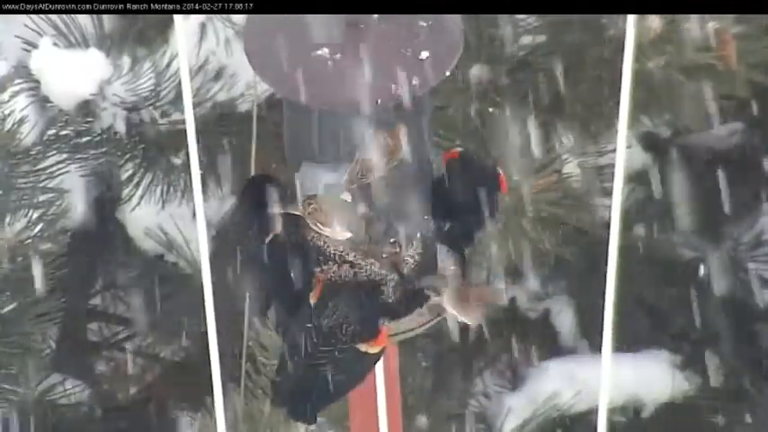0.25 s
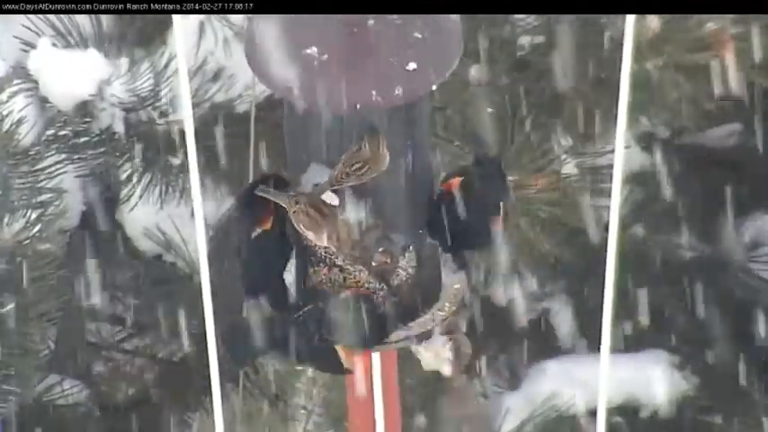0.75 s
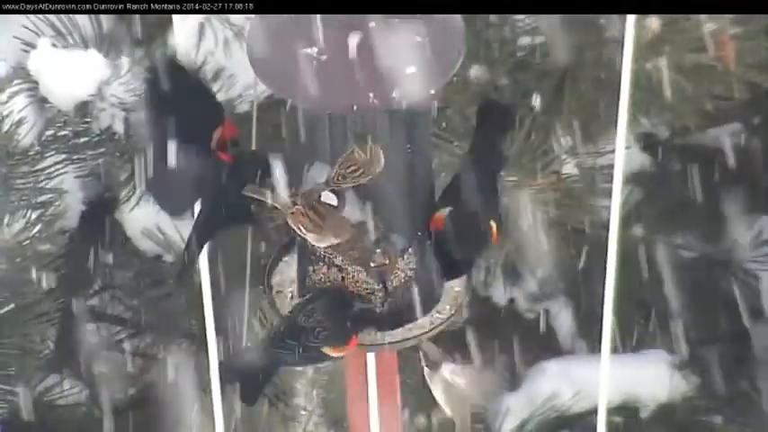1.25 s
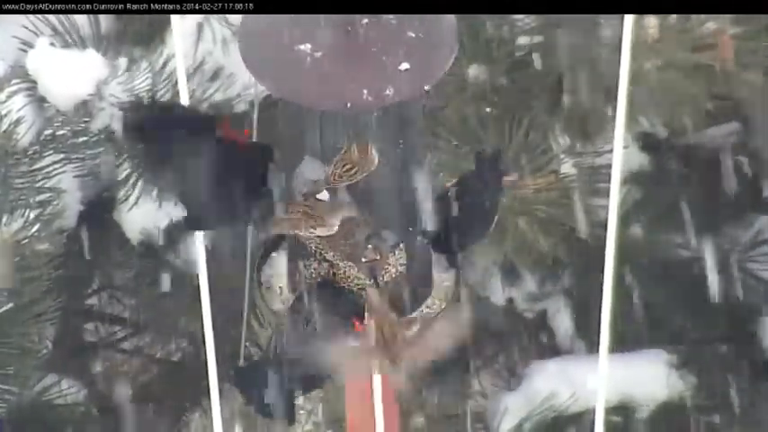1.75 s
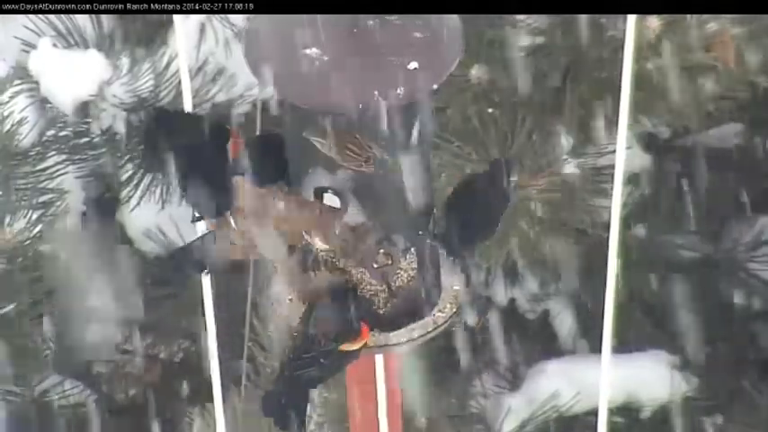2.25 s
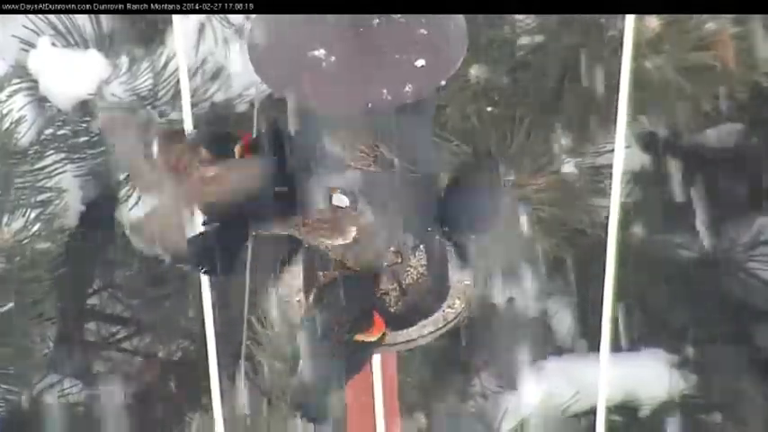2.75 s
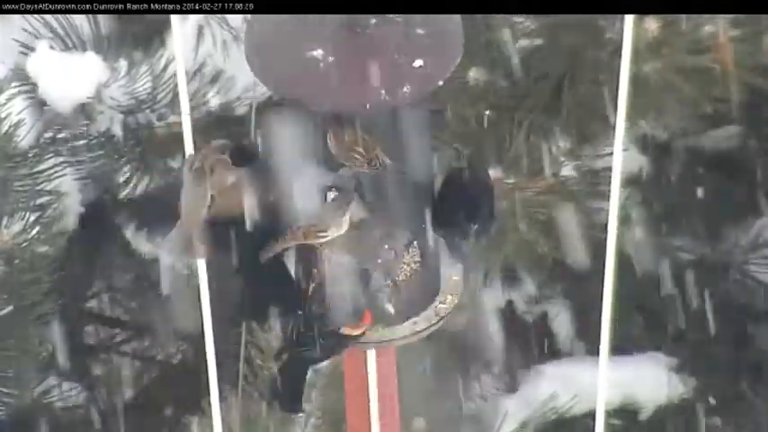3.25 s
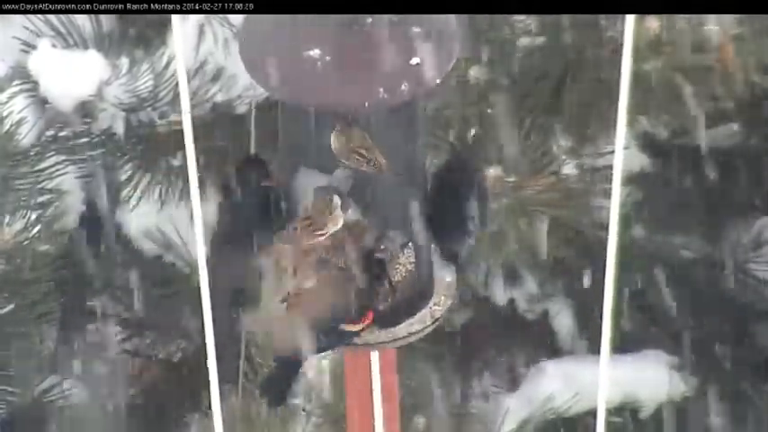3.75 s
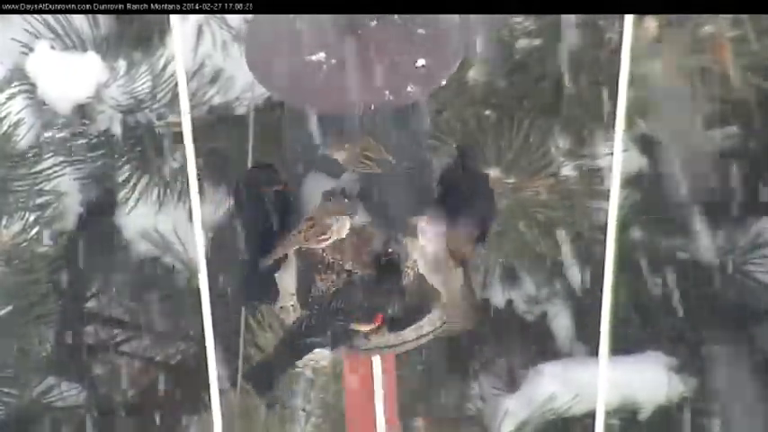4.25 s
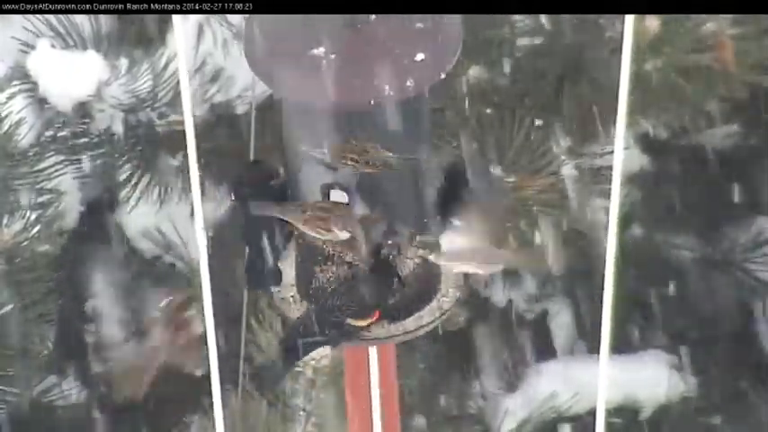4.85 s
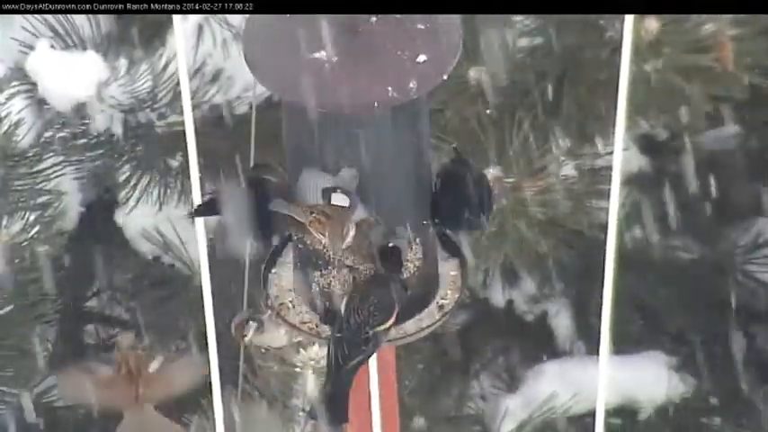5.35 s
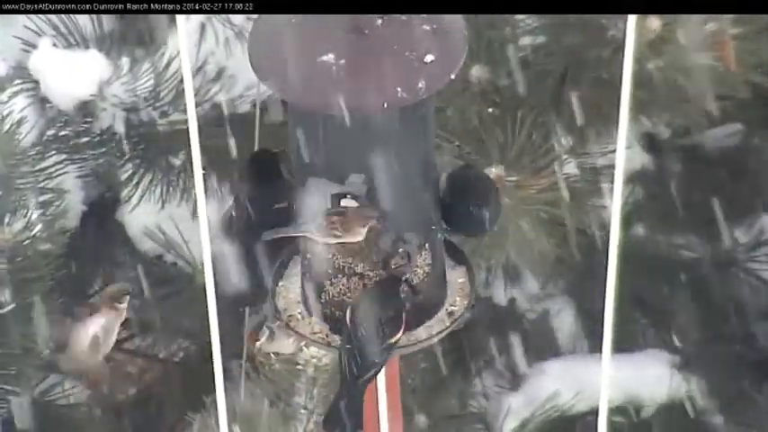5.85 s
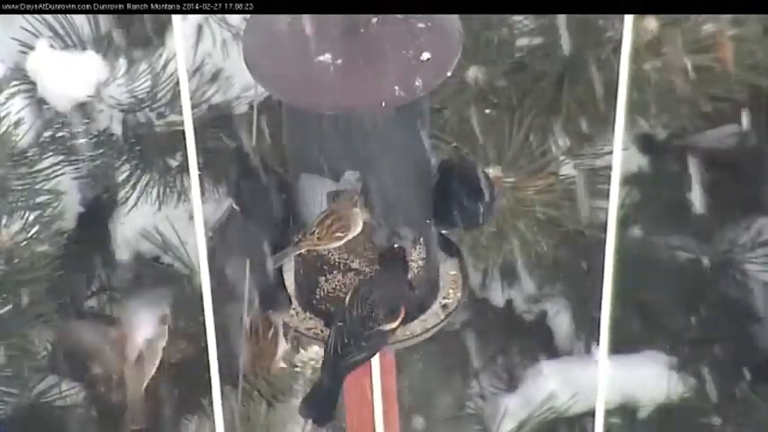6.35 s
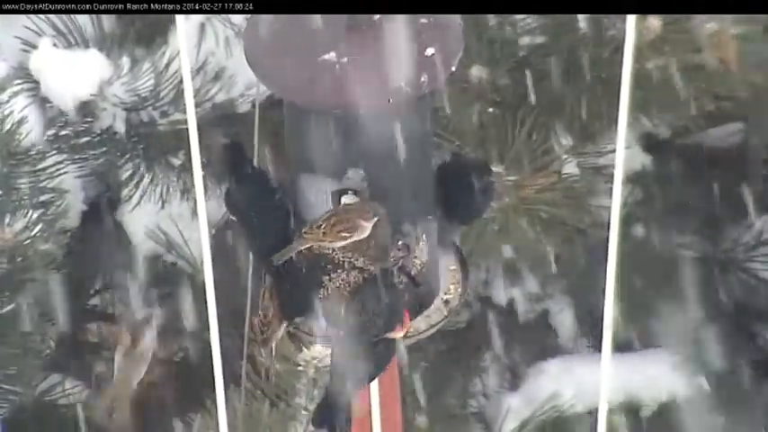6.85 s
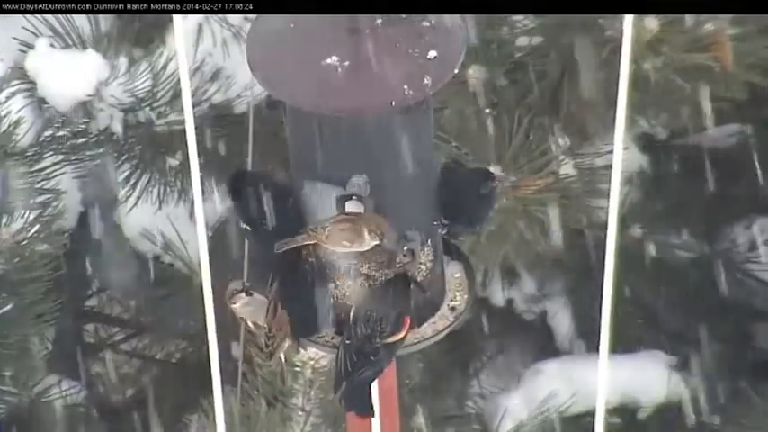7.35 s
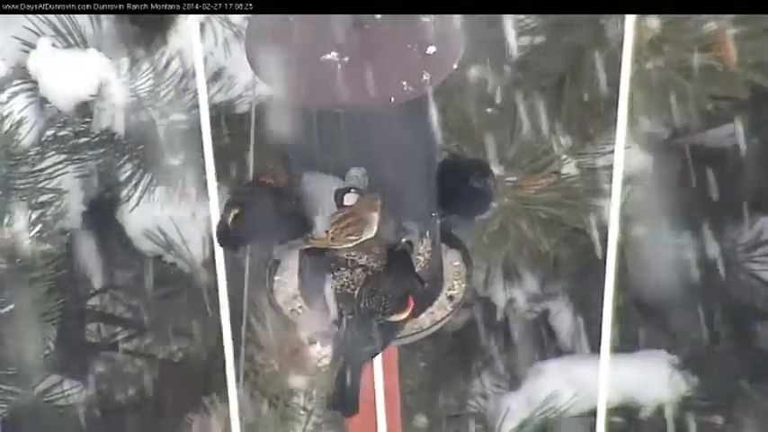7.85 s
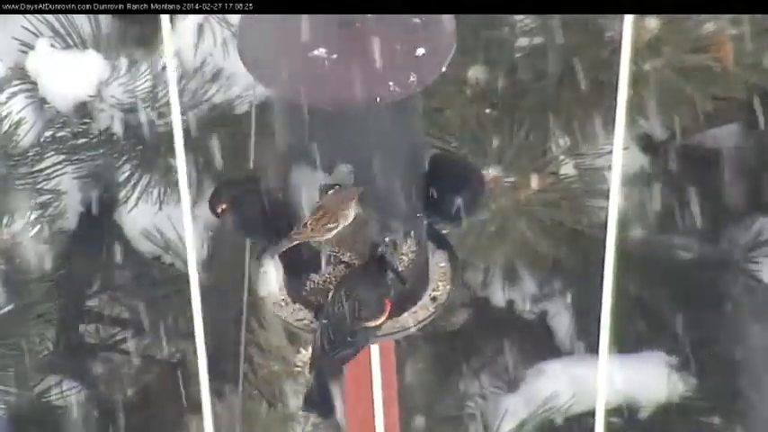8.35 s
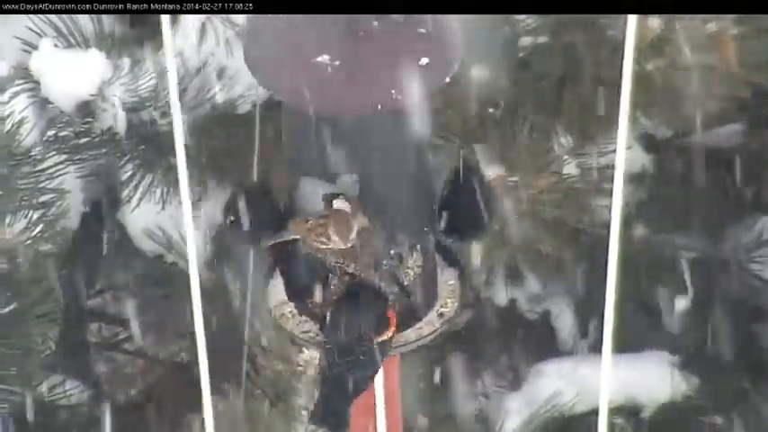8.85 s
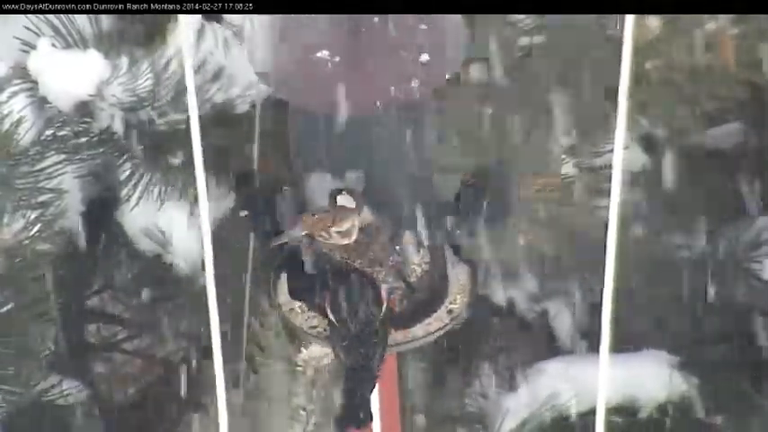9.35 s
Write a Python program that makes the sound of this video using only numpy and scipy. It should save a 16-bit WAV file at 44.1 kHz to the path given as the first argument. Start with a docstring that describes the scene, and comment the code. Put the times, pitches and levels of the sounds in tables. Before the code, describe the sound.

Loud, sharp beak and claw knocks clatter on a hanging seed feeder's tray, seeds rattling, with small birds chirping over a low steady hum.

```python
"""Beaks and claws knock on the tray of a hanging seed feeder: blows ring damped modes and overload the microphone input.
Dry taps and random softer pecks join in; seeds and husks rattle as clumped ticks on a dozen spots of the tray.
Birds chirp, whistle and babble as gliding near sines, and buzz as harmonics through a throat resonance.
Wing gusts and jolts push the microphone; shaped noise makes the outdoor air, a harmonic stack the mains hum."""
import sys
import numpy as np
from scipy import signal
from scipy.fft import rfft, irfft
from scipy.io import wavfile

SR = 44100
rng = np.random.default_rng(int(sys.argv[2]) if len(sys.argv) > 2 else 0)


def output_pcm(signal):
    """Save a mono or channel-first signal as 16-bit PCM at the path in sys.argv[1].

    Samples are clipped to [-1, 1] before scaling.
    """
    pcm = np.clip(np.atleast_2d(signal).T, -1, 1) * 32767
    wavfile.write(sys.argv[1], SR, np.round(pcm).astype(np.int16))


N = 423801


def amp(db):
    """dB to gain."""
    return 10 ** (np.asarray(db) / 20)


def rms_one(x):
    """Scale to unit rms."""
    return x / np.sqrt(np.mean(x ** 2) + 1e-20)


def peak_one(rows):
    """Scale each row to peak 1."""
    return rows / abs(rows).max(1, keepdims=True)


def in_time(rows):
    """Interpolate the columns of a curve to every sample."""
    s, *columns = np.transpose(rows)
    return [np.interp(np.arange(N) / SR, s, c) for c in columns]


def add(out, at_s, x):
    """Mix x into out from a given time on."""
    i = round(at_s * SR)
    out[i:i + len(x)] += x[:N - i]


def flutter(rate_hz):
    """Low-passed noise of spread 1 for random wobble."""
    low_pass = signal.butter(2, rate_hz, fs=SR, output="sos")
    return rms_one(signal.sosfilt(low_pass, rng.standard_normal(N)))


def sine(hz):
    """Sine whose phase sums a moving pitch."""
    return np.sin(2 * np.pi * np.cumsum(hz) / SR)


# spectrum of wind, air and input hiss: (frequency [Hz], relative density [dB per Hz])
OUTDOORS_SPECTRUM = [(12, -52), (20, -15), (65, -9.5), (114, -9.5), (143, -11), (174, -11), (243, -13.5),
                     (288, -14.5), (361, -16), (427, -15), (1550, -14), (2180, -9), (4150, -28.5),
                     (14300, -46), (16400, -56)]
OUTDOORS_RMS_DB = -37


def outdoors():
    """Steady noise shaped by a spectrum over log frequency."""
    hz = np.maximum(np.fft.rfftfreq(N, 1 / SR), 10)
    curve_hz, curve_db = np.transpose(OUTDOORS_SPECTRUM)
    db = np.interp(np.log(hz), np.log(curve_hz), curve_db)
    noise = irfft(rfft(rng.standard_normal(N)) * amp(db), N)
    return amp(OUTDOORS_RMS_DB) * rms_one(noise)


RECTIFIED_MAINS_HZ = 119.9
# multiples 1, 2, .. of the hum: (rms level [dB])
HUM_RMS_DB = [-37, -40.5, -48, -73, -57.5, -57.5]


def hum():
    """Rectified mains leaks into the cable as a steady harmonic stack."""
    turn = 2 * np.pi * RECTIFIED_MAINS_HZ * np.arange(N) / SR
    return sum(np.sqrt(2) * amp(db) * np.sin((k + 1) * turn) for k, db in enumerate(HUM_RMS_DB))


def flock(per_s, low_hz, high_hz, glide, db):
    """Distant birds babble: faint short glides at random times, pitches and levels."""
    out = np.zeros(N)
    for when, pitch, slope, length, level in rng.random((round(per_s * N / SR), 5)):
        length_s = 0.016 + 0.0297 * length
        u = np.linspace(0, 1, round(length_s * SR))
        first_hz = low_hz * (high_hz / low_hz) ** pitch
        hz = first_hz * np.exp(glide * (2 * slope - 1) * u)
        add(out, when * (N - 1) / SR, amp(db + 10 * level) * np.sin(np.pi * u) * sine(hz))
    return out


# buzzy calls, all on one glide: (start [s], level [dB])
BUZZ_CALLS = [(7.76, -32), (7.896, -31.5), (8.047, -30.5), (8.205, -31)]
BUZZ_S, BUZZ_FIRST_HZ, BUZZ_LAST_HZ = .056, 330, 482
THROAT_HZ, THROAT_OCTAVES = 2500, .3


def buzzes(wobble, rasp_db):
    """A low buzzing pitch rises; only the overtones near the throat resonance carry."""
    out, pitch, k = np.zeros(N), 1 + wobble * flutter(90), np.arange(1, 13)[:, None]
    rasp = amp(rasp_db * flutter(120))
    for s, db in BUZZ_CALLS:
        u = np.linspace(0, 1, round(BUZZ_S * SR))
        hz = BUZZ_FIRST_HZ * (BUZZ_LAST_HZ / BUZZ_FIRST_HZ) ** u * pitch[round(s * SR):][:len(u)]
        throat = np.exp(-.5 * (np.log2(k * hz / THROAT_HZ) / THROAT_OCTAVES) ** 2)
        overtones = np.sin(2 * np.pi * k * np.cumsum(hz) / SR + k ** 2)
        stack = (throat * overtones).sum(0)
        add(out, s, amp(db) * np.sin(np.pi * u) ** .5 * rms_one(stack))
    return out * rasp


# steep falling chips of one bird: (start [s], level [dB])
CHIP_CALLS = [(.491, -30), (0.652, -30), (.81, -32), (.971, -32), (1.134, -32), (1.394, -29), (1.468, -30)]
CHIP_S, CHIP_FIRST_HZ, CHIP_LAST_HZ = .009, 4400, 2300
# falling notes between them: (start [s], length [s], level [dB])
FALLING_NOTES = [(.345, 0.032, -41), (0.41, .05, -44), (0.505, 0.05, -38), (.553, .06, -42),
                 (0.678, .04, -35), (0.816, .055, -35), (0.98, .06, -38), (1.148, .055, -38),
                 (1.247, 0.078, -38), (1.486, .07, -42), (1.65, 0.069, -39)]
FALL_FIRST_HZ, FALL_HZ_PER_S = 3500, 12000   # longer notes end lower
# thin high two-note calls: (start [s], level [dB])
HIGH_CALLS = [(.676, -46), (2.125, -58), (4.17, -44), (7.37, -52)]
# notes of such a call: (delay [s], length [s], first pitch [Hz], last pitch [Hz])
HIGH_CALL_NOTES = [(0, 0.034, 5950, 5000), (0.051, 0.029, 5200, 4470)]
# low sagging peeps: (start [s], first pitch [Hz], level [dB])
LOW_PEEPS = [(0.749, 1080, -39), (5.35, 1215, -36.5), (7.165, 1250, -38)]
PEEP_S, PEEP_SAG_RATIO = 0.032, .96
# single glides of other birds: (start [s], length [s], first pitch [Hz], last pitch [Hz], level [dB])
SINGLE_GLIDES = [(.665, 0.059, 1990, 1620, -43), (1.685, .03, 4600, 4080, -49),
                 (1.696, 0.051, 2190, 2720, -33), (2.975, 0.12, 2250, 2440, -37),
                 (2.985, 0.052, 3020, 3130, -42), (3.116, 0.077, 2250, 2440, -32),
                 (3.14, .045, 3030, 3180, -50), (3.33, .033, 3700, 3630, -41),
                 (3.68, 0.051, 1790, 1760, -40), (3.92, 0.13, 1910, 1830, -32.5),
                 (4.115, .057, 2140, 2300, -42), (4.192, 0.038, 4600, 4030, -42),
                 (4.219, 0.04, 2640, 2800, -34), (4.836, 0.065, 2450, 2800, -26.5),
                 (6.816, 0.11, 2100, 3250, -34), (6.876, 0.081, 2100, 2470, -39)]


def glides():
    """List every short call as a row like those of SINGLE_GLIDES."""
    chips = [(s, CHIP_S, CHIP_FIRST_HZ, CHIP_LAST_HZ, db) for s, db in CHIP_CALLS]
    falls = [(s, length_s, FALL_FIRST_HZ, FALL_FIRST_HZ - FALL_HZ_PER_S * length_s, db)
             for s, length_s, db in FALLING_NOTES]
    pairs = [(s + delay_s, *note, db) for s, db in HIGH_CALLS for delay_s, *note in HIGH_CALL_NOTES]
    peeps = [(s, PEEP_S, hz, PEEP_SAG_RATIO * hz, db) for s, hz, db in LOW_PEEPS]
    return chips + falls + pairs + peeps + SINGLE_GLIDES


def short_calls(wobble, rasp_db):
    """Near sines glide under a rounded swell, with fluttering pitch and level."""
    out, pitch, rasp = np.zeros(N), 1 + wobble * flutter(70), amp(rasp_db * flutter(57))
    for s, length_s, first_hz, last_hz, db in glides():
        u = np.linspace(0, 1, round(length_s * SR))
        hz = first_hz * (last_hz / first_hz) ** u * pitch[round(s * SR):][:len(u)]
        add(out, s, amp(db) * np.sin(np.pi * u) ** .5 * sine(hz))
    return np.sqrt(2) * out * rasp


# the louder whistle: (time [s], pitch [Hz], rms level [dB])
WHISTLE_CURVE = [(3.415, 2400, -48), (3.45, 2546, -26.5), (3.49, 2586, -13.5), (3.535, 2565, -16),
                 (3.556, 2550, -34), (3.58, 2570, -23), (3.66, 2484, -32.5), (3.775, 2280, -37),
                 (3.805, 2250, -50)]


def whistle(wobble):
    """One long near sine follows a pitch and level curve."""
    hz, db = in_time(WHISTLE_CURVE)
    t = np.arange(N) / SR
    sounding = (t > WHISTLE_CURVE[0][0]) & (t < WHISTLE_CURVE[-1][0])
    return np.sqrt(2) * sounding * amp(db) * sine(hz * (1 + wobble * flutter(40)))


def push_pull(rows):
    """One push and pull on the microphone for each (start, level, length)."""
    out = np.zeros(N)
    for s, db, length_s in rows:
        u = np.linspace(0, 1, round(length_s * SR))
        add(out, s, amp(db) * np.sin(2 * np.pi * u) * np.sin(np.pi * u))
    return out


# wing gusts on the microphone: (start [s], level [dB], length [s])
WING_GUSTS = [(1.054, -33, .03), (1.156, -36, .025), (1.255, -29, .021), (6.991, -22, .01),
              (7.073, -29.5, .025)]


def gusts():
    """Wings push and pull the air at the microphone."""
    return push_pull(WING_GUSTS)


# jolts of the microphone by hard blows: (start [s], level [dB])
MIC_JOLTS = [(0.038, -22), (0.409, -23), (1.103, -18), (1.233, -24), (1.437, -26), (1.769, -19),
             (2.324, -16), (3.062, -20), (3.821, -11), (4.441, -14), (5.47, -17.5), (6.355, -22),
             (6.551, -9), (7.001, -11), (7.088, -12)]
JOLT_S = 0.00099


def jolts():
    """Hard blows jolt the microphone itself."""
    return push_pull([(s, db, JOLT_S) for s, db in MIC_JOLTS])


def ringing(modes, size):
    """Rows of decaying sines, one for each mode."""
    hz, db, t60_s = np.transpose(modes)[:, :, None]
    t = np.arange(size) / SR
    return amp(db - 60 * t / t60_s) * np.sin(2 * np.pi * hz * t)


# tray modes before contact damping: (frequency [Hz], relative level [dB], t60 [s])
TRAY_MODES = [(1250, -32, 0.0055), (1770, -13.5, 0.061), (2017, -17.5, 0.022), (2180, -7.5, 0.025),
              (2250, -8, 0.016), (2500, 6, 0.008), (2817, 5.5, 0.0099), (3100, 4.5, 0.012),
              (3500, -1, 0.027), (3700, -13, 0.021), (4400, -52, 0.015), (5200, -47, 0.012)]
# modes of the treble snap: (frequency [Hz], relative level [dB], t60 [s])
SNAP_MODES = [(4600, 7.5, 0.0075), (5080, -5, 0.015), (6230, -18, 0.0062), (7050, -34, .003),
              (9700, -29, 0.00099), (12150, 4, .0015), (13900, 2, 0.0013)]
SCATTER_DB = 4   # random spread of each mode


def struck(hz, luck, spread_octaves, blunt_db, size):
    """Body and snap of blows landing near hz: the closest modes sound most, a thin tray radiates no bass."""
    body_luck, snap_luck = np.split(luck, [len(TRAY_MODES)], axis=1)
    octaves_off = np.log2(np.array(TRAY_MODES)[:, 0] / hz[:, None])
    near = np.exp(-.5 * (octaves_off / spread_octaves) ** 2) + 0.024
    body = (near * amp(SCATTER_DB * body_luck)) @ ringing(TRAY_MODES, size=size)
    # each higher snap mode is weaker, more so for blunt blows
    dull_db = -(blunt_db + 0.94 * abs(luck[:, :1])) * np.arange(len(SNAP_MODES))
    snap = amp(dull_db + SCATTER_DB * snap_luck) @ ringing(SNAP_MODES, size=size)
    body = signal.sosfilt(signal.butter(6, 1550, "high", fs=SR, output="sos"), body)
    snap = signal.sosfilt(signal.butter(4, 4000, "high", fs=SR, output="sos"), snap)
    return body, snap


def rattle(median_per_s, size_db, treble_db, clump_db, low_hz, high_hz):
    """Random ticks come in clumps on a dozen spots of the tray; rms 1."""
    sizes = amp(size_db * np.minimum(rng.exponential(1, N), 4)) * rng.choice([-1, 1], N)
    chance = median_per_s * amp(clump_db * flutter(12)) / SR
    ticks = sizes * (rng.random(N) < chance)
    luck = rng.standard_normal((12, len(TRAY_MODES) + len(SNAP_MODES)))
    body, snap = struck(np.geomspace(low_hz, high_hz, 12), luck, 0.23, blunt_db=1.0, size=3000)
    spot_treble_db = treble_db + np.linspace(-7, 7, 12)[:, None]
    spots = peak_one(body) + amp(spot_treble_db) * peak_one(snap)
    dealt = rng.integers(0, len(spots), N)
    return rms_one(sum(signal.oaconvolve(ticks * (dealt == k), spot)[:N] for k, spot in enumerate(spots)))


# bustle on the tray: (time [s], seed rattle level [dB])
BUSTLE_CURVE = [(0.0, -39), (2.4, -33), (2.81, -42.5), (3.56, -32.5), (7.3, -39), (7.97, -35.5),
                (9.6, -39.5)]


def bustle():
    """Seeds rattle densely and husks crack brighter, both under one level curve."""
    seeds = rattle(median_per_s=500, size_db=5.0, treble_db=-49, clump_db=4.5, low_hz=1760, high_hz=2900)
    husks = rattle(median_per_s=89, size_db=4.0, treble_db=-8, clump_db=5.5, low_hz=2100, high_hz=4040)
    return amp(in_time(BUSTLE_CURVE)[0]) * (seeds + amp(-16.5) * husks)


BLUNT_PER_DB = .12   # blows below 0 dB excite the top modes less
CHATTER_SAMPLES = 600


def blows(rows, spread_octaves, contact_s, longer_db, grit, damping_db_per_s):
    """Each contact chatters at the pitch of the spot, longer for harder blows, and grit roughens it."""
    out, t = np.zeros(N), np.arange(CHATTER_SAMPLES) / SR
    s, db, hz, treble_db = np.transpose(rows)
    noise = rng.standard_normal((len(s), CHATTER_SAMPLES))
    luck = rng.standard_normal((len(s), len(TRAY_MODES) + len(SNAP_MODES)))
    press = t * np.exp(-2 * t / (contact_s * amp(db[:, None] * longer_db)))
    blunt_db = BLUNT_PER_DB * np.maximum(-db, 0)[:, None]
    body, snap = struck(hz, luck, spread_octaves, blunt_db, size=3000)
    body = body * amp(-damping_db_per_s * np.arange(body.shape[1]) / SR)
    chatter = np.sin(2 * np.pi * hz[:, None] * t) + grit * noise
    body = peak_one(signal.fftconvolve(press * chatter, body, axes=1))
    snap = peak_one(signal.fftconvolve(press ** 2 * noise, snap, axes=1))
    rings = amp(db)[:, None] * (body + amp(treble_db)[:, None] * snap)
    for at_s, ring in zip(s, rings):
        add(out, at_s, ring)
    return out


# dry taps: (time [s], body peak [dB], ring centre [Hz], snap re body [dB])
DRY_TAPS = [(0.332, -7.5, 2720, -14), (0.8763, -13, 3230, -30), (1.5998, -0.5, 2430, -38),
            (1.6422, -5.5, 2840, -33), (1.9925, -4, 2100, -38), (2.0522, -3.5, 2840, -35),
            (2.5303, -7.5, 2700, -24), (2.5687, -2.5, 3200, -28), (2.7523, -4, 2150, -34),
            (3.57, -7.5, 2570, -30), (3.906, -11, 2370, -25), (3.931, -11, 1900, -33),
            (4.6961, -4.5, 2150, -39), (4.8009, -2, 2240, -24), (4.862, -9.5, 2660, -20),
            (5.5147, -11, 2640, -25), (6.3072, -10, 2250, -32), (6.5532, -1, 2180, -38),
            (6.634, -1.5, 2150, -44), (7.0452, -5, 2150, -27), (7.4626, 3, 2250, -35),
            (7.6085, -3.5, 2700, -29), (7.678, -3.5, 2800, -8), (8.109, -1, 2900, -39),
            (8.148, -11.5, 2520, -10), (8.4365, -12, 2380, -34), (8.5203, -11.5, 2370, -6),
            (8.7044, -10, 2800, -23), (9.3902, -10.5, 2210, -3)]


def taps():
    """The beak stays down and damps the ring."""
    return blows(DRY_TAPS, spread_octaves=0.52, contact_s=0.00044, longer_db=1.16, grit=0.97,
                 damping_db_per_s=5000)


PECK_COUNT = 70
# ranges of body peak, ring centre and snap re body
PECK_DB, PECK_HZ, PECK_TREBLE_DB = (-22.5, -13.5), (2070, 3070), (-34, -7)


def pecks():
    """Draw softer pecks at random as rows like those of CLEAR_KNOCKS."""
    low, high = np.transpose([(0, N / SR), PECK_DB, PECK_HZ, PECK_TREBLE_DB])
    return low + (high - low) * rng.random((PECK_COUNT, 4))


# clear beak and claw knocks: (time [s], body peak before clipping [dB], ring centre [Hz], snap re body [dB])
CLEAR_KNOCKS = [(.0392, 10.5, 2527, -28.5), (.0429, -1.5, 2380, -26), (.2134, -11.5, 2460, -26),
                (.4081, 13, 2065, -28), (.4636, 0, 2600, -29), (.5209, -14, 2110, -27),
                (.611, -17, 2280, -29), (.6275, -13.5, 2600, -29), (.543, -7, 2970, -43),
                (.692, -9.5, 2300, -44), (.7233, -5, 2600, -44), (.8388, -2, 2520, -38),
                (1.1039, 6, 2176, -24), (1.1087, -14, 1830, -36), (1.2335, 4.5, 2926, -28),
                (1.2428, 4, 1846, -34), (1.3101, -4, 2520, -9), (1.3412, -.7, 2520, -28),
                (1.3477, -7, 3100, -27), (1.3556, -6, 3040, -24), (1.3696, -11, 2670, -10),
                (1.4084, -8.5, 2700, -18), (1.4308, 5, 2520, -12), (1.4383, 11, 2760, -17),
                (1.5706, -3, 2460, -41), (1.5794, -2, 2320, -42), (1.629, -2.5, 2484, -33),
                (1.7699, 8.5, 2367, -16), (1.785, -14, 1740, -25), (1.863, 1.5, 2370, -25),
                (1.887, -4, 2190, -13), (1.9, -12, 2540, -8), (1.9759, -15, 2160, -31),
                (2.1566, -10.5, 2280, -39), (2.2245, -4.5, 2780, -35), (2.2523, -9.5, 2870, -32),
                (2.2698, 5, 2645, -36), (2.3235, 5, 2447, -34), (2.4619, -2, 2780, -36),
                (2.503, -10.5, 2420, -5), (2.5554, -6.5, 2270, -24), (2.6055, -9.5, 2680, -36),
                (2.6348, -12, 2610, -34), (3.0637, 5, 2670, -4), (3.0923, 0.5, 2560, -20),
                (3.1132, 3, 2320, -27), (3.2025, -4.5, 2690, -11), (3.2677, -7, 2180, -36),
                (3.276, -3, 1940, -27), (3.2889, -9, 2280, -25), (3.2964, -3, 2500, -9.5),
                (3.5315, -9.5, 2600, -9), (3.5757, -7.5, 2420, -13), (3.6163, -12.5, 2380, -5.5),
                (3.6435, -11.5, 2690, -25), (3.7554, -11, 2500, -21), (3.809, 4.5, 2506, -28),
                (3.8215, 4, 2140, -27), (3.844, 7, 2460, -38), (3.9385, -12.5, 2260, -33),
                (3.9516, -9, 2340, -34), (3.977, -9, 2110, -34), (4.252, -8, 2000, -38),
                (4.3051, -9.5, 3400, -18), (4.398, -27, 2900, 8), (4.4399, 9, 2230, -20),
                (4.448, -8, 2900, -20), (4.454, -8.5, 2800, -25), (4.499, -11.7, 2720, -32),
                (4.5812, -11, 2750, -35), (4.5996, -6, 2260, -19), (4.689, -16.5, 3020, -25),
                (4.8123, 1, 2235, -2.5), (4.8198, -9, 2250, -17), (4.9018, -1.5, 3000, -23),
                (4.9284, -14, 2550, -22), (4.971, -10.5, 2530, -14), (4.9982, -13.5, 2600, -20),
                (5.0527, -13.5, 2200, -17), (5.158, -19, 2100, -7), (5.171, -7.5, 2300, -40),
                (5.2986, -3, 2600, -42), (5.31, -9, 2200, -37), (5.3499, -11, 2680, -37),
                (5.472, -6.5, 2500, -42), (5.477, -10.5, 2740, -31), (5.812, -16, 2090, -22),
                (6.028, -13.5, 2320, -30), (6.0508, -15, 2110, -31), (6.09, -12.5, 2320, -18),
                (6.167, -11, 2350, -36), (6.1918, -17.5, 2550, -6), (6.3405, -16, 2420, -15),
                (6.3553, 5, 2950, -7), (6.4384, -7, 2270, -41), (6.542, -13, 2230, -32),
                (6.7815, -11, 2570, -36), (6.9333, -17, 2410, -20), (6.9824, -12, 2720, -18),
                (7.0002, 3.5, 2300, -36), (7.062, -9, 3040, -26), (7.0874, 10.5, 2077, -14.5),
                (7.1014, -4, 2370, -31), (7.2065, -18.5, 2160, -7), (7.3824, -15, 2780, -32),
                (7.4405, -3, 2356, -31), (7.4895, 5.5, 2700, -38), (7.5452, -13, 2970, -8),
                (7.578, -11.5, 1890, -16), (7.75, -13, 2600, -29), (7.8303, 6, 2324, -14.5),
                (7.9625, -17, 2720, -8), (7.982, -16.5, 2360, -30), (8.1794, 5.5, 2660, -31),
                (8.2901, -14.5, 1840, -5), (8.3238, 5.5, 2400, -20), (8.5501, -5, 2070, -25),
                (8.7318, -3.5, 2540, -32), (8.8012, -13, 2400, -8.5), (8.9219, -5.5, 2200, -9),
                (9.035, -0.5, 2790, -46), (9.0415, -4.5, 2380, -32), (9.1821, -8.5, 2180, -38),
                (9.3232, -16, 2250, -6)]


def knocks():
    """Clear knocks and soft pecks leave the tray to ring briefly."""
    return blows(np.vstack([CLEAR_KNOCKS, pecks()]), spread_octaves=0.24, contact_s=0.002,
                 longer_db=0.0938, grit=2.8, damping_db_per_s=300)


def scene():
    """Sum air, hum, birds, microphone bumps and tray at one microphone."""
    background = outdoors() + hum()
    voices = flock(per_s=30, low_hz=1765, high_hz=2600, glide=0.127, db=-42)
    voices += buzzes(wobble=.01, rasp_db=2.0)
    voices += short_calls(wobble=0.0072, rasp_db=2.0) + whistle(wobble=0.0021)
    bumps = gusts() + jolts()
    tray = bustle() + taps() + knocks()
    return (background + voices + bumps + tray)[None]


CUTOFF_HZ = 16500


def record(dry):
    """The input clips hard at full scale, then a steep low-pass cuts the top."""
    clipped = np.clip(dry, -1, 1)
    return signal.sosfilt(signal.cheby2(14, 90, CUTOFF_HZ, fs=SR, output="sos"), clipped)


dry = scene()
out = record(dry)
output_pcm(out)
```